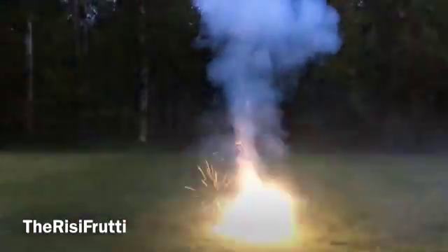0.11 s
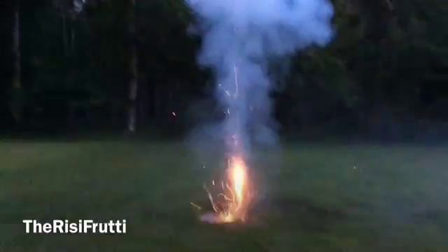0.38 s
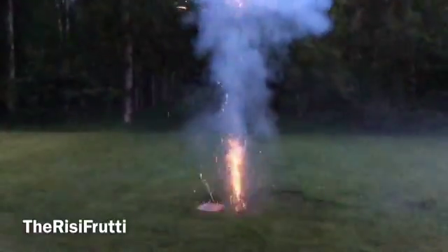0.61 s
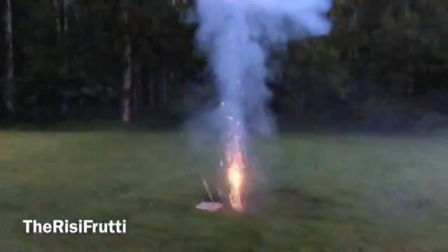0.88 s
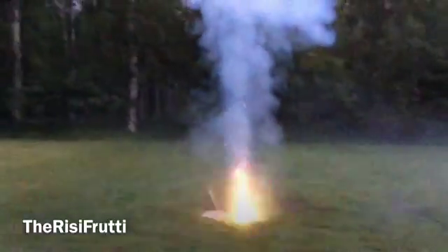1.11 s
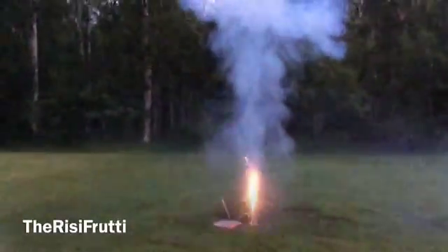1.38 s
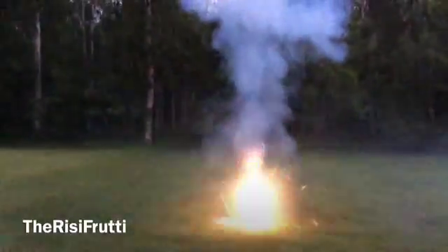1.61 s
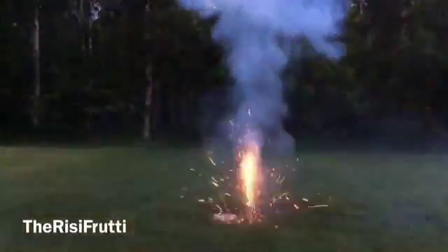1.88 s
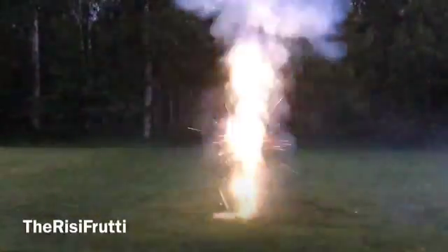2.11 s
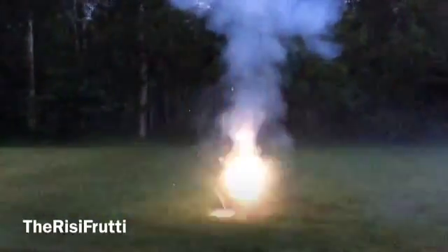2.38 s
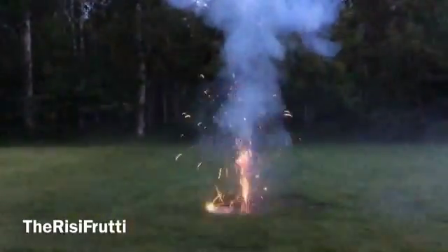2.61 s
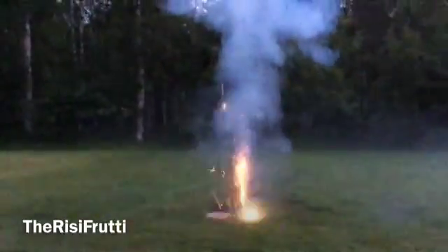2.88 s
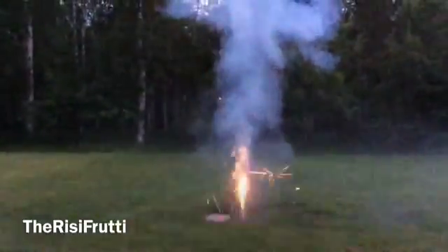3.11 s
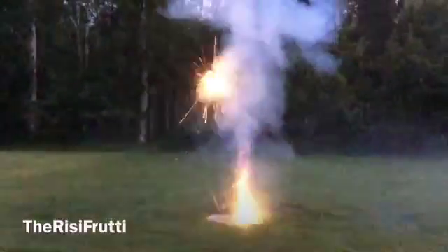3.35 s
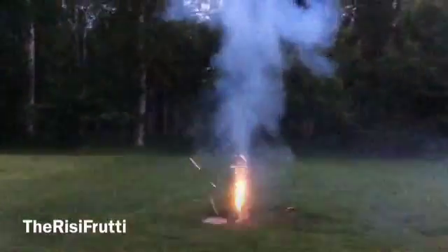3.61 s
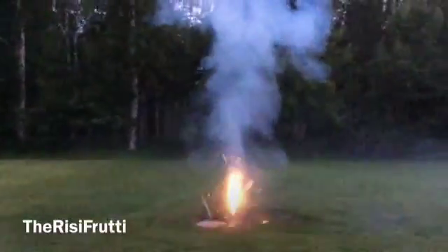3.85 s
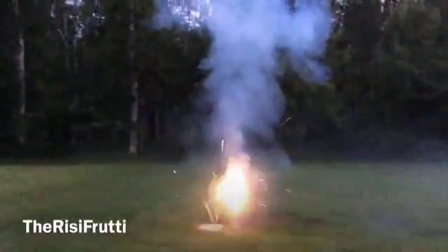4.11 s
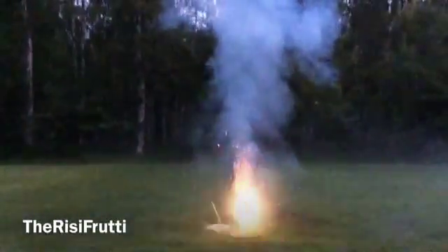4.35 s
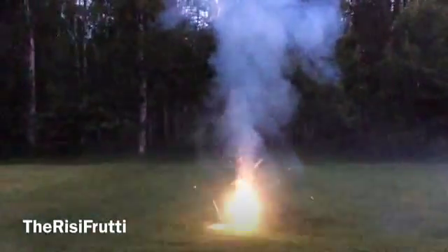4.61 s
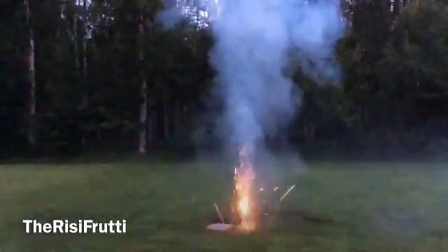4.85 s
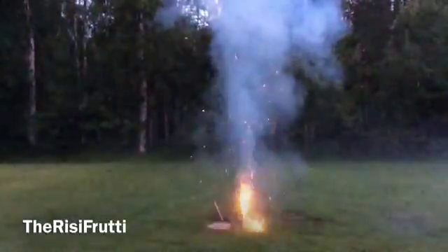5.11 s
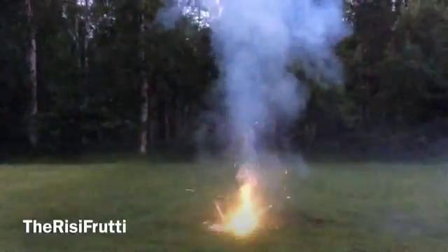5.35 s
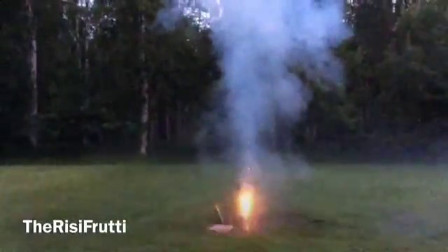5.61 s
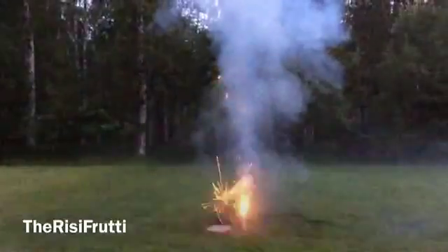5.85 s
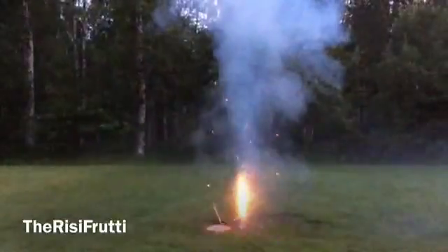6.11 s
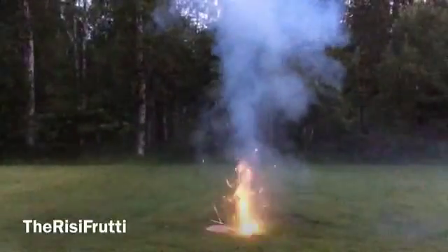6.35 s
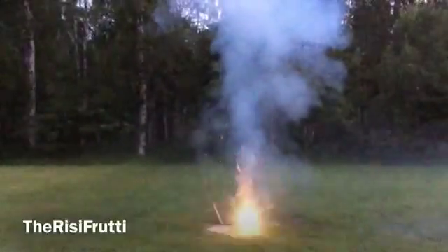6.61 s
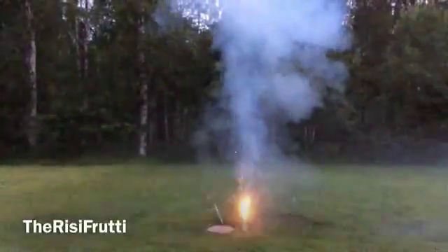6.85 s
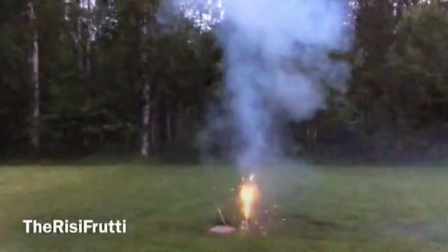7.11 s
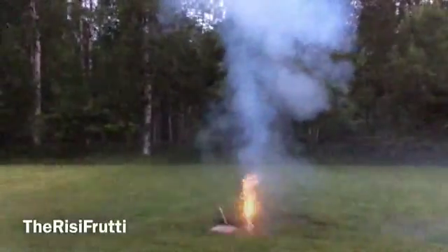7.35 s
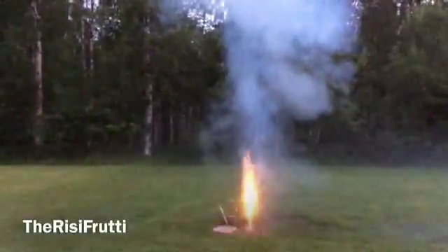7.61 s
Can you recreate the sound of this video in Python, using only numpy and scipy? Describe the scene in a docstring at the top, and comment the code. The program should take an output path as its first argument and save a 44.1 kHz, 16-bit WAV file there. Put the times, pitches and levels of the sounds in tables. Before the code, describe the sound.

Outdoors before a wood, crackling stars explode one by one without steady rhythm: bright clicks, punchy low booms, occasional woody mid knocks. Bursts are densest from about two to five seconds, then somewhat sparser, but still going at the end. Each leaves a grainy, bright wash of reflections that ducks briefly under the next thump; loud peaks distort on a fairly close microphone.

```python
"""On a lawn in front of a wood, a ground fountain firework burns and its crackling stars burst one by one.
Each star is a sharp crack of clicks and noise; the big ones add a deep thump shaped as a pressure pulse.
Echoes come back from the trees as a wash of noise bands over the hiss of the jet, with one short slap.
The wash dips briefly around each thump. Some stars knock in the mids, and faint crackles fall at random."""
import sys
import numpy as np
from scipy import signal
from scipy.fft import rfft, irfft
from scipy.io import wavfile

SR = 44100
rng = np.random.default_rng(int(sys.argv[2]) if len(sys.argv) > 2 else 0)


def rack_gain(trim_db):
    """Turn a fader trim in dB into the linear factor to multiply a signal by."""
    fader = np.asarray(trim_db, float)
    return 10 ** (fader / 20)


def file_out(sig):
    """Save sig as 16-bit WAV at sys.argv[1]."""
    # one column per channel
    cols = np.atleast_2d(sig).T
    # limit, then scale
    lim = np.clip(cols, -1, 1)
    pcm = np.round(lim * 32767).astype(np.int16)
    wavfile.write(sys.argv[1], SR, pcm)


N = 340452
MARGIN, LEAD = 1024, 96     # samples: room around each event, room ahead of a crack's main click

# Colour of air path and microphone for all that is bright. Each row: frequency in Hz, gain in dB.
AIR_AND_MIC_COLOUR = [(60, -6.5), (500, -5.5), (1400, -7), (2100, -5), (2600, -11.5), (3600, -5.5),
                      (4700, -7.5), (5200, -2.5), (5800, -3), (7000, -14), (8200, -10), (9300, -7.5),
                      (11000, -12.5), (12500, -14), (15500, -30)]
# Echoes from the wood, band by band, before that colour.
# Each row: low edge in Hz, high edge in Hz, level in dB, decay by 60 dB in seconds.
WOOD_BANDS = [(38.6, 195, -46, 2.5), (500, 4400, -36.5, 0.38), (1220, 2280, -40, 2.03),
              (2740, 3800, -30, 0.75), (4080, 4990, -28, 0.68), (5930, 9640, -26, 0.57),
              (9650, 21000, -32, 0.45)]
# Single reflectors. Each row: delay in seconds, level in dB, low edge in Hz, high edge in Hz.
REFLECTORS = [(0.0205, -16.5, 1700, 2320)]
# Ride on echoes and jet together. Each row: time in seconds, gain in dB.
WASH_RIDE = [(0, -0.5), (.45, 1), (1, -4), (1.4, -1), (2.5, -1), (2.85, 0.5), (3.2, -1), (3.6, 3),
             (4, -1.5), (4.8, 1), (6.2, -4), (6.55, 2.5), (6.75, -3), (6.95, 3), (7.03, -3), (7.13, 3.5),
             (7.22, -3.5), (7.72, -2.5)]
# Big stars, crack and thump. Each row: time in seconds, crack peak in dB, thump level in dB.
BIG_STARS = [(.0059, -4.5, -8), (.0178, -0.5, -15), (.0641, -6, -7.5), (.1274, -3, -6.5),
             (.2227, -10, -6.5), (.2338, 9, -36), (.2434, -1.5, -8), (.2518, -2.5, -9.5), (.2603, 5, -7.5),
             (.3817, -8, -8.5), (.488, 0.5, -6), (.5925, -2, -13), (.7687, -2.5, -6.5), (.8765, -4.5, -7.5),
             (1.2111, -6, -6), (1.3704, -5, -18), (1.3773, -0.5, -7.5), (1.5554, -4, -12),
             (1.5833, 3.5, -15), (1.6103, 4.5, -14), (1.629, 4.5, -7.5), (1.705, -12.5, -6),
             (1.7194, -1.5, -12), (1.8162, -6, -8), (1.8653, 6.5, -9.5), (1.9242, 1.5, -7.5),
             (1.9574, -4, -15), (2.0491, -8, -26), (2.0585, -2, -13.5), (2.1821, -6, -5), (2.1952, 3, -24),
             (2.204, -5, -9), (2.2114, -2, -13.5), (2.2577, -4, -10), (2.2691, -2.5, -37),
             (2.3021, -5.5, -7), (2.321, -2, -6), (2.3869, -2, -7), (2.416, 7, -16.5), (2.4446, -6.5, -7),
             (2.4961, -3.5, -6.5), (2.6388, -6, -7), (2.6431, 3.5, -12), (2.646, -6, -8.5),
             (2.7527, -6, -8.5), (2.7666, -3, -12.5), (2.7739, 11, -9), (2.8154, 9, -21),
             (2.9611, -1.5, -17), (3.0365, 0, -9), (3.084, 1.5, -6), (3.0901, 5, -12), (3.124, 0, -7),
             (3.1443, -3.5, -11.5), (3.1847, -0.5, -6.5), (3.2848, -3, -14.5), (3.3178, -4.5, -9),
             (3.4186, 9.5, -6), (3.4473, -13, -5), (3.4627, 6, -15), (3.548, 1.5, -14.5), (3.62, 7, -9),
             (3.662, -2.5, -8), (3.749, -1.5, -24.5), (3.9046, -4, -12), (3.929, -3.5, -21),
             (3.9516, -5.5, -8), (4.0548, 8.5, -21.5), (4.1019, 5.5, -11.5), (4.109, -0.5, -6.5),
             (4.1584, 3.5, -21.5), (4.218, -5.5, -8.5), (4.2658, -11, -4), (4.2728, 1.5, -3.5),
             (4.2877, -1, -17), (4.3855, 5.5, -17.5), (4.521, -1, -14.5), (4.5554, 2, -13),
             (4.578, -1.5, -12), (4.6185, -3, -18), (4.6967, -1.5, -7.5), (4.712, 1.5, -30),
             (4.734, -13, -8.5), (4.7398, -1, -11.5), (4.8407, 0, -8), (4.9, 0, -13.5), (4.9354, 5, -27),
             (4.9435, -11, -7), (5.0105, -6.5, -8.5), (5.0582, -3, -7.5), (5.1805, 1.5, -16.5),
             (5.2701, -5, -11.5), (5.3103, 2, -6), (5.412, 5, -8), (5.4587, 1.5, -10), (5.5329, -4, -6.5),
             (5.61, 9, -5.5), (5.6211, -5, -12.5), (5.7177, -8, -10), (5.8313, -5, -5.5),
             (5.948, 1.5, -18.5), (6.0457, -8, -7.5), (6.2662, -5, -6.5), (6.4592, 4, -14),
             (6.5721, -4.5, -9.5), (6.7197, 1.5, -17.5), (6.7502, -8, -8.5), (6.8212, 3, -14.5),
             (6.9288, 1, -17), (7.165, 0, -7), (7.435, -5.5, -11), (7.5072, 2.5, -3.5), (7.5573, 4, -21.5)]
# Small stars, a dry crack over a very faint thump. Each row: time in seconds, crack peak in dB.
SMALL_STARS = [(.077, 6.5), (.196, 2), (0.386, -1), (.686, -0.5), (0.913, 2.5), (1.1474, -13), (1.171, -17),
               (1.2734, -14.5), (1.3107, 4), (1.3236, -14), (1.408, 7.5), (1.5461, 1), (1.695, 3.5),
               (1.739, -4.5), (1.7635, -2.5), (1.772, -6.5), (1.804, -0.5), (1.8278, -23), (1.8434, 3.5),
               (1.849, -1), (1.9155, 8.5), (2.197, -1), (2.2056, 13), (2.2959, -1.5), (2.426, -1),
               (2.648, 10), (2.713, 4), (2.7328, 3), (2.788, -2), (2.79, -6), (2.7923, 4), (2.8186, -5),
               (2.933, -7), (3.3706, -6), (3.3903, -4), (3.677, -4.5), (3.8169, -8), (3.8655, -5),
               (3.8699, 2), (3.8834, -17), (3.922, 6), (4.0326, -9.5), (4.0609, -1), (4.0773, -1),
               (4.0801, 6), (4.2502, 3.5), (4.281, 6), (4.3149, -8), (4.321, -15), (4.3503, -5),
               (4.4288, -10.5), (4.471, 1), (4.507, -8), (4.6706, -8), (4.688, -5.5), (4.81, -15),
               (5.1324, 1), (5.1909, -13), (5.2783, -1.5), (5.379, -6), (5.6023, 3), (5.705, -4),
               (5.7784, -2), (5.8682, -9.5), (5.9444, 2.5), (6.0872, -15.5), (6.1274, 6), (6.1464, -1),
               (6.2519, -3), (6.3143, 3), (6.3416, -7.5), (6.4015, -3), (6.4109, 2.5), (6.478, -20),
               (7.0883, -15.5), (7.2148, -25), (7.4807, -14), (7.6082, -4), (7.615, -3), (7.677, -8.5)]
# Short, fuller knocks in the mids. Each row: time in seconds, level in dB, pitch in Hz.
MID_KNOCKS = [(0.6862, -10, 2150), (.9131, -15, 1840), (1.1473, -24, 2000), (1.1717, -17, 1990),
              (1.311, -2.5, 1490), (1.4088, -21, 1670), (5.9448, -5.5, 2000), (7.0887, -12.5, 2100),
              (1.958, -13, 450), (2.0595, -11, 500), (2.212, -9.5, 530), (2.962, -14.5, 496),
              (3.549, -23, 560), (4.386, -7, 390), (4.6193, -9, 486), (6.5722, -13, 370), (6.822, -11, 420)]
# Ragged low-mid bloom round each thump.
# Each row: low edge in Hz, high edge in Hz, level in dB, half length in seconds.
THUMP_BLOOM = [(100, 291, -8.5, 0.017), (250, 530, -21.5, 0.013), (500, 1300, -27, 0.011)]

WOOD_DELAY_S, WOOD_RISE_S = 0.047, 0.013
NEAR_DB, NEAR_T60_S = -2, 0.17      # near bushes, level relative to each wood band
JET_DB = -61                        # relative to full-scale noise in each wood band, before colour and ride
CRACK_NOTCH_HZ, CRACK_NOTCH_Q = 5150, 7     # a narrow gap in every crack
THUMP_CUT_HZ = 59
SMALL_THUMP_DB = -39                # thump of a small star, relative to its crack
FAINT_PER_S, FAINT_DB, FAINT_SPREAD_DB = 30, -37, 3.5   # average rate, mean peak and its spread
KNOCK_RISE_CYCLES, KNOCK_FALL_CYCLES = 0.35, 0.33
KNOCK_WIDTH = 1.0                   # ripple bandwidth as a share of the pitch
RIPPLE_CYCLES, RIPPLE_DB = 3.0, -11     # half length; level for a knock at 500 Hz, weaker above


def stars():
    """All bursts in time order, as columns: time in seconds, crack peak in dB, thump level in dB."""
    small = [(s, db, db + SMALL_THUMP_DB) for s, db in SMALL_STARS]
    return np.transpose(sorted(BIG_STARS + small))


def in_place(values):
    """One click of the given size at the moment of each burst."""
    train = np.zeros(N)
    at = np.round(stars()[0] * SR).astype(int).clip(0, N - 1)
    np.add.at(train, at, values)
    return train


def coloured(x, causal=1.0):
    """Air and microphone colour; below causal = 1 the filter rings a little ahead of a click as well."""
    hz = np.maximum(np.fft.rfftfreq(2048, 1 / SR), 20)
    point_hz, point_db = np.transpose(AIR_AND_MIC_COLOUR)
    gain_db = np.interp(np.log(hz), np.log(point_hz), point_db)
    # folding the cepstrum forward moves the ringing behind the click
    cepstrum = irfft(np.log(rack_gain(gain_db)))
    cepstrum[1:1024] *= 1 + causal
    cepstrum[1025:] *= 1 - causal
    kernel = np.roll(irfft(np.exp(rfft(cepstrum))), LEAD)[:512]
    kernel = kernel.reshape((1,) * (x.ndim - 1) + (-1,))
    return signal.fftconvolve(x, kernel, axes=-1)[..., :x.shape[-1]]


def drift(rate_hz):
    """Slow random wander of spread 1: noise through two equal poles, drawn at every 40th sample."""
    r = np.exp(-80 * np.pi * rate_hz / SR)
    noise = rng.standard_normal(N // 40 + 2002)
    slow = signal.lfilter([1], [1, -2 * r, r * r], noise)[2000:]     # drop the filter's run-in
    return np.interp(np.arange(N) / 40, np.arange(len(slow)), slow / slow.std())


def wash(strength, crack_peaks, jet_db):
    """Scattered echo power per band: near bushes return cracks at once, the tree line the whole burst
    after the round trip; the steady hiss of the jet joins in the same bands."""
    t = np.arange(SR) / SR
    late = np.maximum(t - WOOD_DELAY_S, 0)
    grit = 2.3 * drift(300)      # dB; fine random grit in the level of the wash, shared by all bands
    burst_power = in_place(strength ** 2)
    near_decay = rack_gain(2 * NEAR_DB - 120 * t / NEAR_T60_S)
    near = signal.fftconvolve(in_place(crack_peaks ** 2), near_decay)[:N]
    burst_power[0] += 2.5        # stars that burst just before
    out = 0
    for low_hz, high_hz, level_db, t60 in WOOD_BANDS:
        spread = (1 - np.exp(-late / WOOD_RISE_S)) * rack_gain(-120 * late / t60)
        far = signal.fftconvolve(burst_power, spread)[:N]
        power = rack_gain(2 * level_db) * (far + near).clip(0) + rack_gain(2 * jet_db)
        flicker = rack_gain(2.5 * drift(15.6) + grit + 1.33 * drift(200))
        band = signal.butter(2, [low_hz, high_hz], "band", fs=SR, output="sos")
        noise = signal.sosfilt(band, rng.standard_normal(N))
        out = out + np.sqrt(power) * flicker * noise
    return coloured(out)


def thumps(times, peaks):
    """A pointed pressure push between a pointed and a smooth trough, through the microphone's bass cut;
    small ones are shorter."""
    t = np.arange(-MARGIN, MARGIN) / SR
    out = np.zeros(N + 2 * MARGIN)
    vary = rack_gain(2.0 * rng.standard_normal((len(times), 6)))
    noise = rng.standard_normal((len(times), len(t)))
    uneven = rng.standard_normal((len(times), len(THUMP_BLOOM)))
    ragged = 0
    for k, (low_hz, high_hz, level_db, half_s) in enumerate(THUMP_BLOOM):
        band = signal.butter(2, [low_hz, high_hz], "band", fs=SR, output="sos")
        swell = rack_gain(level_db + 4.5 * uneven[:, [k]]) * np.exp(-(t / half_s) ** 2)
        ragged = ragged + swell * signal.sosfilt(band, noise)
    for s, peak, v, rough in zip(times, peaks, vary, ragged):
        size = min(peak / 0.36, 1.15)
        length = size ** 0.76 + 0.076
        slope = np.where(t < 0, t / (0.001 * v[0]), -t / (0.00115 * v[1]))
        push = 1.55 * np.exp(slope / np.sqrt(length))
        ahead_width = np.where(t < -0.0072, 0.0036 * v[3], 0.0024)
        ahead = 0.8 * size * v[2] * np.exp(-abs((t + 0.0072) / ahead_width) ** 1.3)
        behind = 0.93 * v[4] * np.exp(-((t / length - 0.0033) / 0.0042) ** 2)
        front = t / 0.00064
        punch = -0.75 * v[5] * front * np.exp(-front ** 2)     # steep fall of the front knocks in the low mids
        at = round(s * SR)
        out[at:at + len(t)] += peak * (push + punch - ahead - behind + rough)
    out = signal.lfilter(*signal.butter(1, THUMP_CUT_HZ, "high", fs=SR), out)
    both_ways = signal.butter(2, 33, "high", fs=SR, output="sos")     # a second cut rings both ways
    return signal.sosfiltfilt(both_ways, out)[MARGIN:MARGIN + N]


def dips(thump_peaks):
    """Gain that sinks about a millisecond ahead of each thump and recovers after it, deeper for big ones."""
    t = np.arange(-MARGIN, 4 * MARGIN) / SR
    shape = np.where(t < 0, np.exp(-(t / 0.00077) ** 2), np.exp(-t / 0.0088))
    return rack_gain(-18 * signal.fftconvolve(in_place(thump_peaks), shape)[MARGIN:MARGIN + N])


def crack_shapes(count):
    """A shock front, its bounce off the lawn and a short tail of bright noise; peak 1."""
    t = np.arange(640) / SR
    draw = rng.random((count, 4))
    noise = rng.standard_normal((count, len(t)))
    # the noise dies by 60 dB in 4 ms, over a weaker tail of 14 ms
    tail_decay = rack_gain(-10 * draw[:, :1] - 60 * t / 0.004 - 11) + rack_gain(-26 - 60 * t / 0.014)
    shapes = signal.lfilter([1, -0.4], [1], noise) * tail_decay
    shapes[:, 0] += 1
    shapes[:, 3] -= 1.3 + 0.6 * draw[:, 3]     # the suction half of the shock
    # the bounce: a second click within half a millisecond, random in delay, sign and size
    bounce = (SR * (0.00008 + 0.0004 * draw[:, 1])).astype(int) + 1
    shapes[np.arange(count), bounce] += 0.7 * (2 * draw[:, 2] - 1)
    shapes = coloured(shapes, causal=0.4)
    shapes = signal.lfilter(*signal.iirnotch(CRACK_NOTCH_HZ, CRACK_NOTCH_Q, fs=SR), shapes)
    return shapes / abs(shapes).max(axis=1, keepdims=True)


def cracks(times, peaks):
    """Each star's shock gets a random shape of its own, laid in at its moment and peak."""
    out = np.zeros(N + 2 * MARGIN)
    for s, peak, shape in zip(times, peaks, crack_shapes(count=len(times))):
        at = round(s * SR) + MARGIN - LEAD
        out[at:at + len(shape)] += peak * shape
    return out[MARGIN:MARGIN + N]


def slaps(bursts):
    """A hard surface sends back a single, band-limited echo of the bursts."""
    out = np.zeros(N)
    for delay_s, level_db, low_hz, high_hz in REFLECTORS:
        lag = round(delay_s * SR)
        band = signal.butter(1, [low_hz, high_hz], "band", fs=SR)
        out[lag:] += rack_gain(level_db) * signal.lfilter(*band, bursts)[:-lag]
    return out


def faint_crackles():
    """Tiny stars crack at random moments, with exponential waits between them."""
    wait, size = rng.exponential(1, 300), rng.standard_normal(300)
    times = np.cumsum(wait) / FAINT_PER_S
    heard = times < N / SR
    return cracks(times[heard], rack_gain(FAINT_DB + FAINT_SPREAD_DB * size[heard]))


def knocks():
    """About one cycle at the knock's pitch, inside a weak ragged ripple of band noise."""
    t = np.arange(-MARGIN, MARGIN) / SR
    out = np.zeros(N + 2 * MARGIN)
    noises = rng.standard_normal((len(MID_KNOCKS), len(t)))
    for (s, level_db, hz), noise in zip(MID_KNOCKS, noises):
        edges_hz = [hz * (1 - KNOCK_WIDTH / 2), hz * (1 + KNOCK_WIDTH / 2)]
        band = signal.butter(2, edges_hz, "band", fs=SR, output="sos")
        shape = np.exp(hz * np.where(t < 0, t / KNOCK_RISE_CYCLES, -t / KNOCK_FALL_CYCLES))
        cycle = shape * np.cos(2 * np.pi * hz * t + np.pi / 3)
        ripple_swell = rack_gain(RIPPLE_DB) * np.sqrt(500 / hz) * np.exp(-(t * hz / RIPPLE_CYCLES) ** 2)
        ripple = ripple_swell * signal.sosfilt(band, noise)
        at = round(s * SR)
        out[at:at + len(t)] += rack_gain(level_db) * (cycle + ripple)
    return out[MARGIN:MARGIN + N]


def scene():
    """Direct bursts in front, echoes and jet behind them, faint crackles on top."""
    times, crack_db, thump_db = stars()
    crack_peaks, thump_peaks = rack_gain(crack_db), rack_gain(thump_db)
    strength = 0.49 * crack_peaks + 2.45 * thump_peaks     # the thump excites the wood most
    ride = rack_gain(np.interp(np.arange(N) / SR, *np.transpose(WASH_RIDE)))
    echoes = ride * (slaps(cracks(times, strength)) + wash(strength, crack_peaks, JET_DB))
    direct = cracks(times, crack_peaks) + thumps(times, thump_peaks) + knocks()
    return (direct + dips(thump_peaks) * echoes + faint_crackles())[None]


def roll_off(x):
    """The treble ends steeply here."""
    return signal.sosfilt(signal.butter(12, 16500, fs=SR, output="sos"), x)


def record(dry):
    """Peaks clip hard at 0.8 of full scale, then a steep low-pass takes off the top."""
    clipped = np.clip(dry, -0.8, 0.8)
    top_cut = signal.butter(10, 14300, fs=SR, output="sos")
    mix = signal.sosfilt(top_cut, clipped)
    return roll_off(mix)


dry = scene()
out = record(dry)
file_out(out)
```